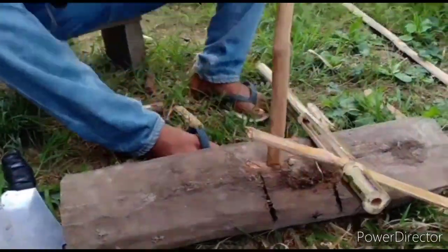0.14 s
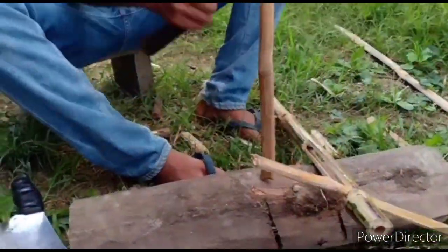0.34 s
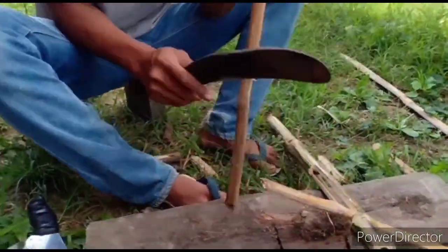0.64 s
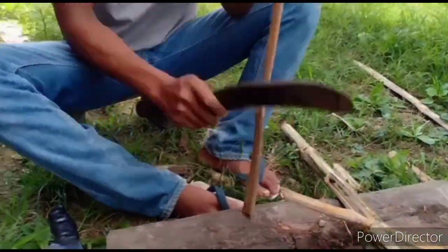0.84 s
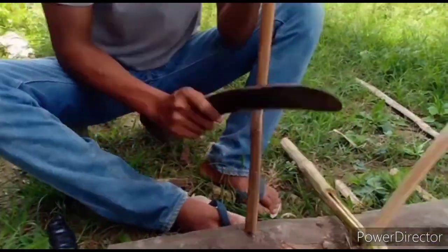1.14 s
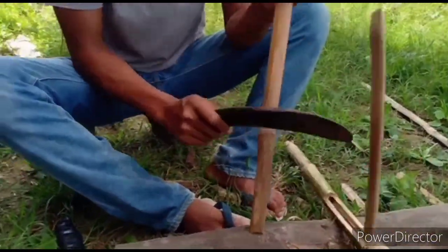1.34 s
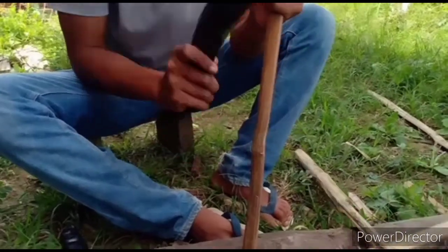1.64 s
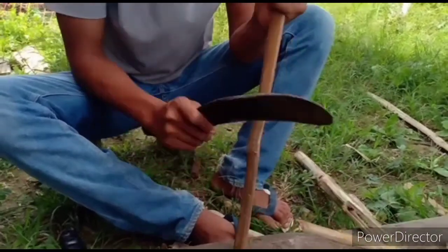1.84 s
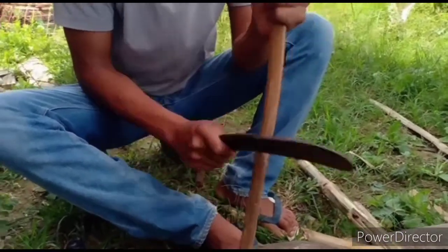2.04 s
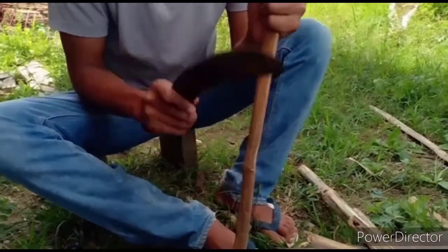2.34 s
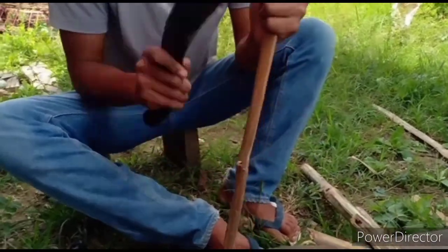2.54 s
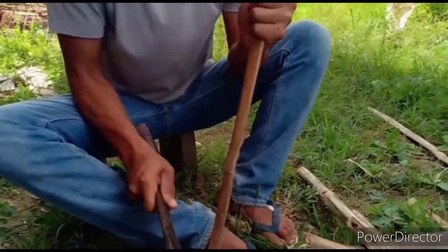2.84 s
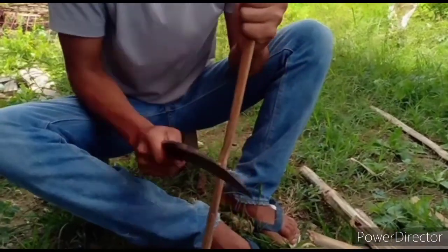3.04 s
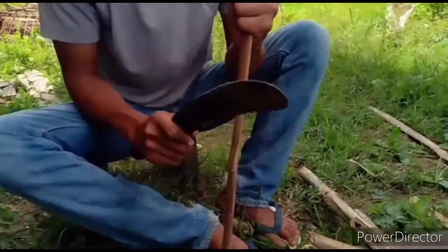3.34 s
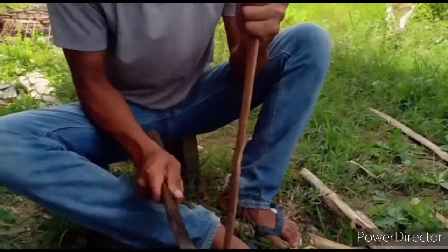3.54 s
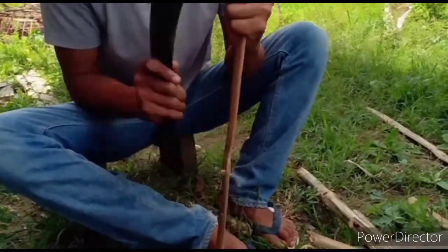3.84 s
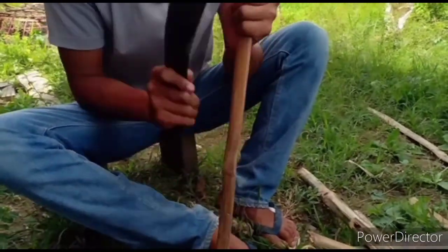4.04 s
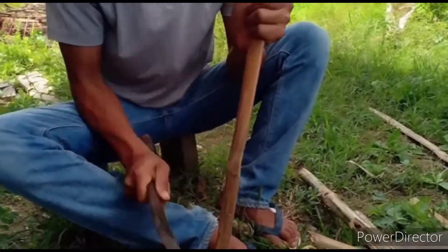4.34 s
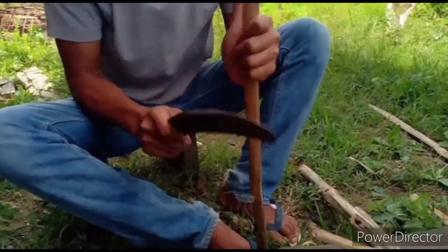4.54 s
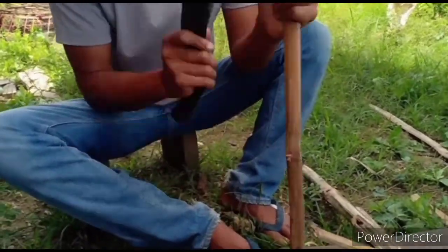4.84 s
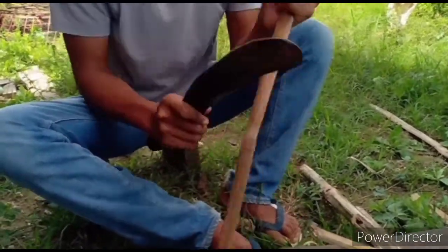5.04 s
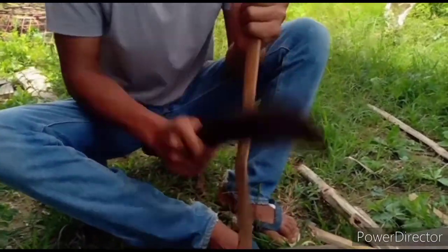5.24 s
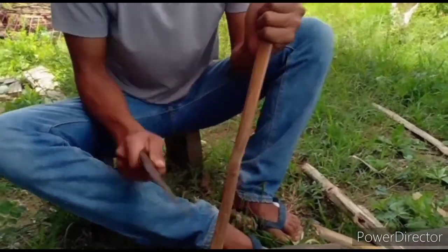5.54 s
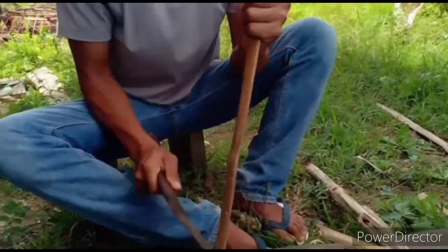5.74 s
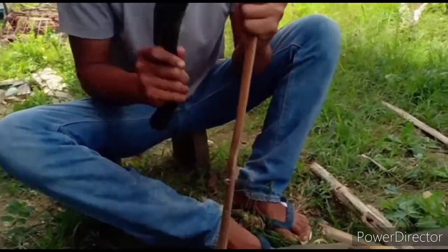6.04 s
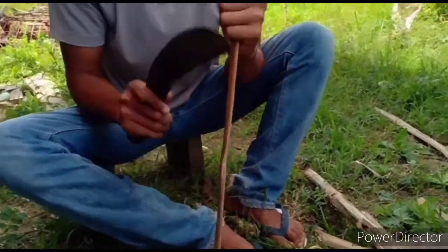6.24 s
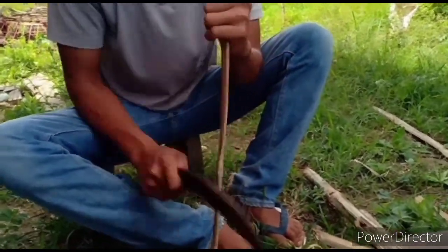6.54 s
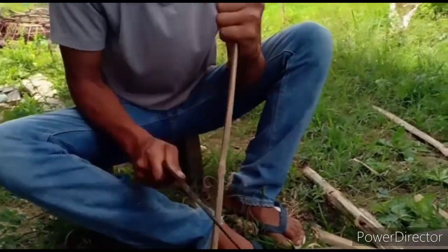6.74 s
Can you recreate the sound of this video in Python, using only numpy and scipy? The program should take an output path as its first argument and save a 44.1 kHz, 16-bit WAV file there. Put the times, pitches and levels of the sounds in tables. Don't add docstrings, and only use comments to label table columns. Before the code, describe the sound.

Close up outdoors, a steel blade gives a faint short ring, then chops a standing bamboo stick about five times a second. Each stroke is a sharp woody crack with a brief fibrous rip, while splinters and hollow offcuts tick and ring. Low wind gusts thump the small, thin-sounding microphone over faint hiss; a distant dove is barely audible. The last strokes grow lighter.

```python
import sys
import numpy as np
from scipy import signal
from scipy.io import wavfile
from scipy.ndimage import uniform_filter1d

SR = 44100
rng = np.random.default_rng(int(sys.argv[2]) if len(sys.argv) > 2 else 0)


def linear_from_db(decibels):
    return 10 ** (np.asarray(decibels, float) / 20)


def digitize_waveform(pressure):
    field = np.atleast_2d(pressure).T
    bounded = np.clip(field, -1, 1)
    quanta = np.round(bounded * 32767).astype(np.int16)
    wavfile.write(sys.argv[1], SR, quanta)


N = 303408

# pitch_hz, level_db
FIELD_COLOUR = [(18, -47), (30, -47), (48, -5), (196, -3.5), (732, -7), (1120, -11.5), (1840, -13),
                (2400, -15.5), (14800, -22.5), (16500, -26)]
# peak_s, level_db, swell_ms (to rise 20 dB), fade_ms (to fall 20 dB)
GUSTS = [(0.248, -34, 123, 74), (0.441, -37.5, 135, 187), (.69, -39.5, 39, 350), (.88, -36.5, 118, 323),
         (1.18, -37, 52, 45), (1.46, -40, 703, 111), (1.89, -34, 222, 76), (2.279, -36, 100, 30),
         (2.55, -39.5, 319, 175), (2.681, -35.5, 12, 98), (2.869, -35, 31, 66), (2.996, -32, 30, 44),
         (3.18, -52.5, 400, 400), (3.349, -41.5, 35, 206), (3.53, -45.5, 400, 300), (3.659, -32, 74, 140),
         (4.05, -41, 330, 57), (4.46, -31, 106, 37), (4.58, -44, 300, 502), (4.82, -47, 400, 105),
         (4.94, -42, 19, 289), (5.08, -41.5, 148, 64), (5.21, -43.5, 98, 1), (5.52, -35.5, 205, 218),
         (5.94, -43, 90, 247), (6.15, -41, 24, 795), (6.4, -46.5, 800, 100), (6.442, -27, 23, 81),
         (6.474, -27, 66, 13), (6.6, -50, 200, 342)]
# start_s, level_db, pitch_hz
SLAPS = [(0.241, -14.5, 188), (0.682, -33, 263), (0.737, -22, 232), (.764, -27, 260), (.781, -28, 280),
         (1.167, -14, 290), (1.187, -16, 265), (1.735, -38, 325), (1.867, -16.5, 184), (2.351, -21, 364),
         (2.376, -24.5, 310), (2.225, -26, 223), (2.453, -23, 408), (2.537, -16, 246), (2.608, -21.5, 155),
         (2.681, -13, 234), (2.876, -22, 219), (3.345, -29, 165), (3.654, -37, 210), (3.704, -18.5, 159),
         (4.126, -19, 478), (4.659, -21, 227), (4.808, -20.5, 260), (4.931, -22.5, 179), (5.063, -22, 160),
         (5.387, -24, 267), (5.46, -17, 205), (5.501, -14.5, 151), (6.047, -21, 191), (6.149, -21, 255),
         (6.253, -19, 178), (6.323, -18.5, 180), (6.265, -15, 310),
         (.178, -23, 251), (0.191, -21, 140), (.44, -26, 240), (0.861, -23, 280), (.925, -18, 229),
           (0.944, -32, 230), (1.153, -20, 300), (1.326, -27, 260), (1.452, -26, 129), (1.832, -23, 200),
           (1.849, -24, 200), (1.887, -16, 198), (2.534, -19, 105), (2.675, -21, 125), (2.978, -20, 148),
           (3.858, -19, 150), (3.958, -25, 170), (4.447, -13, 404), (4.463, -31, 130), (4.966, -20, 302),
           (5.197, -32, 240), (5.526, -24, 238), (6.164, -23, 258), (6.424, -17, 140), (6.449, -13, 251),
           (6.459, -15, 141), (6.469, -8, 237), (6.632, -25.5, 130)]
# start_s, level_db, pitch_hz
SPIKES = [(0.199, -31.5, 560), (0.238, -28.5, 560), (0.246, -20.5, 427), (0.29, -35, 344),
          (0.878, -23.5, 480), (0.915, -29.5, 393), (0.949, -30.5, 386), (0.968, -36, 404),
          (1.304, -30.5, 356), (1.451, -31, 361), (1.832, -34, 400), (1.874, -26, 474), (1.961, -31, 470),
          (2.4555, -32, 630), (2.531, -33, 401), (2.88, -32, 474), (3.0, -31, 410), (3.353, -31, 338),
          (3.657, -24.5, 364), (4.036, -32.5, 370), (4.433, -27.5, 500), (4.498, -38, 861),
          (5.457, -30, 520), (6.254, -30, 444), (6.414, -42, 390), (6.433, -26, 366), (6.449, -27.5, 425),
          (6.468, -27, 333), (6.475, -43, 396)]
# start_s, length_s, pitch_hz, level_db
COOS = [
    (0.084, 0.067, 554, -56),
    (1.556, 0.17, 655, -62.5),
    (3.07, 0.06, 664, -58),
]
# time_s, level_db
SCRAPE = [
    (0.648, -37),
    (0.682, -47.5),
    (0.72, -51),
    (0.84, -71),
]
# start_s, level_db, pitch_hz
THUDS = [
    (0.671, -25.5, 970),
    (3.944, -13, 970),
    (5.748, -17, 1030),
]
# start_s, pitch_hz, level_db,
# fade_s (to fall 60 dB)
PIECES = [(0.0328, 1780, -36, .04), (.427, 3900, -40, .02), (0.418, 1160, -52, 0.029),
          (0.455, 1920, -47, .06), (.6485, 2380, -28, .03), (.648, 1800, -35, 0.022),
          (.6715, 1880, -37, 0.07), (1.066, 1880, -45, 0.05), (1.092, 4350, -26, 0.03),
          (1.095, 2900, -41, .1), (1.093, 6000, -24, 0.02), (1.218, 4900, -38, 0.013),
          (1.218, 5930, -45, .025), (1.729, 5250, -43, 0.08), (1.733, 3000, -40, .07),
          (1.729, 1120, -38, .12), (1.728, 2180, -44, .1), (1.81, 1836, -52, 0.13),
          (1.927, 1240, -41, 0.033), (1.93, 3530, -46, .06), (2.083, 2070, -37, .025),
          (2.087, 3160, -48, .07), (2.268, 1780, -51, .06), (2.268, 3700, -52, 0.055),
          (2.46, 1260, -32, 0.034), (2.463, 1696, -44, 0.079), (2.461, 4380, -34, 0.051),
          (2.646, 680, -36, 0.026), (2.65, 3210, -39, .07), (2.65, 1893, -32.5, 0.066),
          (2.846, 1238, -33, 0.029), (3.225, 2745, -23, .03), (3.225, 6000, -24.5, .02),
          (3.238, 1755, -39, 0.05), (3.229, 4080, -32, 0.055), (3.73, 877, -32.5, 0.039),
          (3.735, 1635, -29, 0.035), (3.742, 3250, -41, .07), (3.911, 5900, -26, .02),
          (3.914, 3682, -38, 0.04), (3.914, 860, -33, .025), (3.953, 4070, -34, 0.03),
          (3.951, 1395, -38, 0.03), (3.948, 1755, -47, .05), (4.52, 3920, -36, 0.051),
          (4.585, 1776, -39, 0.061), (4.585, 3330, -40, .035), (4.75, 3330, -40.5, 0.024),
          (4.749, 910, -36.5, 0.019), (4.983, 1880, -46, 0.12), (4.631, 1400, -57, 0.028),
          (5.302, 3740, -35, .06), (5.303, 890, -44.5, .06), (5.318, 1710, -39, 0.047),
               (5.49, 4059, -23, 0.041), (5.49, 2700, -30, .02), (5.716, 1740, -32, 0.047),
               (5.764, 4075, -46, 0.11), (5.752, 1400, -33, .03), (5.932, 1690, -25, 0.035),
               (5.941, 764, -32, 0.06), (6.138, 2800, -35, .025), (6.138, 1410, -38, 0.031),
               (6.141, 4030, -38, 0.084), (6.365, 11940, -33, 0.032), (6.365, 2170, -41, 0.047),
               (6.565, 8021, -38, .025), (6.565, 2190, -42, .03), (6.568, 1400, -47, .05),
               (6.76, 1860, -42.5, 0.072), (6.76, 1520, -42, .05), (6.76, 855, -38, .05),
          (.033, 2100, -33, .015), (.061, 1880, -46, .16), (.648, 4130, -39, .04),
                 (1.094, 703, -39, 0.18), (1.7045, 4500, -24, 0.018), (1.741, 840, -41.5, 0.14),
                 (1.742, 2020, -45, .12), (2.46, 2000, -24, 0.018), (3.9455, 3250, -22, 0.022),
                 (4.1275, 1550, -27, 0.02), (5.298, 4950, -24, .015),
          (.0328, 4900, -48, .02), (.678, 1950, -38, .025), (.687, 2350, -41, .06),
             (.654, 2400, -36, .03), (1.069, 1880, -31, .05), (1.1, 4200, -36, .06), (2.268, 850, -26, .05),
             (3.043, 3500, -27, .03), (3.058, 1780, -42, .07), (4.1315, 640, -25, .03),
             (4.142, 3350, -39, .05), (4.318, 3650, -29, .04), (5.95, 3400, -36, .03),
             (5.941, 1550, -21, .02)]
# pitch_hz, level_db, fade_s
SHAVING = [(3640, 0, 0.085), (3200, -24, 0.066), (1750, -23, 0.28)]
# pitch_hz, level_db, fade_s
CHIP = [(1395, -6, 0.13), (1610, -17, 0.025), (3200, -13, 0.011), (4134, -24, 0.06), (4060, -20, 0.07),
        (7800, -40, 0.046)]
# pitch_hz, level_db, fade_s
HOLLOW = [(720, 8.5, 0.088), (847, -10.5, 0.26), (1260, -3.5, 0.22), (1734, -1.5, 0.14), (2240, -22, 0.07),
          (1836, -3, 0.14), (4050, -18, 0.052), (5300, -16, 0.054)]
# pitch_hz, level_db, fade_s
BLADE = [(1885, 4.5, 0.046), (1780, -35, 0.31), (3620, -39, 0.018), (860, -5, 0.011), (1300, -2, 0.014)]
# start_s, level_db
SHAVING_RINGS = [(2.652, -38), (3.042, -34), (3.228, -45), (4.132, -39), (4.316, -38)]
# start_s, level_db
CHIP_RINGS = [
    (3.944, -28),
    (5.7518, -32),
    (6.762, -41.5),
]
# start_s, level_db
HOLLOW_RINGS = [(0.42, -41.5), (1.092, -35.5), (1.255, -57), (1.727, -35), (1.741, -41.5), (2.265, -51)]
# start_s, level_db
BLADE_RINGS = [(0.0321, -20.5), (0.0411, -37), (0.4195, -30), (0.673, -39), (1.065, -54), (1.1284, -44),
               (1.489, -41), (4.128, -35), (4.584, -34), (4.7489, -38.5), (4.9469, -29), (4.9566, -21),
               (5.4903, -32), (5.942, -36)]
# start_s, change_db
GRIPS = [
    (0.0475, -18),
    (4.9645, -8),
]
# start_s, level_db
KNOCKS = [(0.0322, -27), (1.7040, -24.5), (2.081, -17), (2.4597, -17), (2.6447, -23), (2.846, -18.5),
          (4.1279, -23), (4.3119, -24.5), (4.5154, -15), (4.9473, -21), (5.2975, -11), (5.4894, -25.5),
          (5.7119, -24)]
# pitch_hz, level_db
FIBRES = [(180, -12), (300, -14), (820, -3.5), (1900, -7.5), (2520, -12.5), (3650, -8), (5190, -7.5),
          (8730, -8), (12600, -6), (15200, -21), (16500, -4)]
# pitch_hz, fade_s
TEAR_FADE = [(500, 0.068), (3500, 0.09), (5500, 0.062), (9000, 0.052), (15000, 0.08)]
# start_s, blow_db, stick_hz, tear_db, treble_db
CHOPS = [(0.3855, -13, 2660, -12.5, -3.5), (1.0645, -12, 2090, -13, -11.5), (1.0923, -13, 1830, -11, -12.5),
         (1.7041, -13.5, 1190, -15, -9.5), (2.0817, -10, 814, -16, -9.5), (2.2639, -11, 830, -9.5, -12.5),
         (2.4596, -8, 1920, -15, -13), (2.6449, -9, 1260, -8.5, -4.5), (2.845, -9.5, 1850, -9.5, -2),
         (3.0397, -16, 1630, -9, -6), (3.2238, -15, 1680, -8, 0), (3.5368, -14, 870, -10.5, -3),
         (3.7296, -13.5, 1550, -14.5, -13), (3.9094, -12, 1850, -13, -1), (4.1269, -13, 610, -13.5, -8.5),
         (4.3119, -10.5, 1660, -7.5, -1), (4.5155, -8.5, 1400, -13.5, -11), (4.9472, -6.5, 1450, -10, -9),
         (5.2978, -6, 1580, -13, -11), (5.4893, -8, 1380, -7.5, -5), (5.7117, -11, 1270, -9.5, -9),
         (5.9318, -15.5, 1590, -12, -5), (6.1371, -22, 1640, -12.5, -3), (6.364, -27, 2240, -17, 0)]
# start_s, blow_db, stick_hz, tear_db, treble_db
TOUCHES = [(0.0326, -36, 1880, -42, -33), (0.4182, -25, 1900, -24, -6), (0.6715, -46, 2000, -22, -55),
           (0.8939, -28, 870, -24, -14), (1.128, -42, 1900, -35, -26), (1.218, -28.5, 1300, -34, -22),
           (1.254, -42, 1300, -42, -30), (1.488, -26.5, 1730, -37.5, -48), (1.727, -22, 1080, -25, -18),
           (1.926, -24, 870, -24.5, -34), (3.152, -50, 1710, -39.5, -26), (3.3495, -31.5, 904, -37, -55),
           (3.9455, -30, 1270, -35, -13), (4.585, -28, 1800, -38, -28), (4.7482, -31.5, 1820, -42, -17),
           (4.9544, -20, 1820, -23, -33), (5.1239, -34, 865, -45, -49), (5.749, -28, 1310, -36, -11),
           (5.9415, -16, 1590, -24, -20), (6.564, -24, 1980, -19.5, -1), (6.7564, -26, 1390, -20, -6)]
# start_s, splinter_hz, level_db (against the blow)
SPLINTERS = [(0.386, 5070, 6), (0.894, 3200, -11), (1.064, 5950, -9), (1.092, 8040, 2.5), (1.218, 7600, -5),
             (1.254, 1580, 1), (1.704, 4530, -5), (1.727, 2940, -11), (1.925, 4460, -.5),
             (0.671, 2020, -11), (2.46, 2280, -32), (5.941, 3080, -16), (2.082, 4400, 1), (2.264, 4500, 1),
             (1.128, 2900, 0), (3.04, 3480, -0.5), (3.224, 4300, 2), (3.73, 4400, -3), (3.909, 4290, -2.5),
             (3.945, 3250, 9), (4.127, 3430, -1), (4.312, 3600, -15), (4.585, 3200, -3), (4.749, 3100, -8),
             (4.947, 5200, -11), (5.712, 4070, -6), (5.932, 4500, 3), (6.137, 4420, 8.5),
             (6.364, 4800, 8.5)]


def evened(x):
    return x / np.sqrt(np.mean(x ** 2) + 1e-20)


def peaked(x):
    return x / abs(x).max()


def read(points, hz):
    f, value = np.transpose(points)
    return np.interp(np.log(hz + 1), np.log(f + 1), value)


def add(mix, s, sound):
    part = mix[max(round(s * SR), 0):][:len(sound)]
    part += sound[:len(part)]


def resonate(x, hz, width):
    turn = np.exp(2j * np.pi * np.cumsum(hz * np.ones(len(x))) / SR)
    r = np.exp(-np.pi * width / SR)
    smooth = signal.lfilter([1 - r], [1, -r], x / turn + 1e-18)
    return 2 * (turn * smooth).real


def push(hz, tail, cusp):
    turn = np.arange(-1, 3, hz / SR)
    return np.cos(2 * np.pi * turn) * np.exp(-abs(turn / np.where(turn < 0, .4, tail)) ** cusp)


def breaker(hz, front):
    t = np.arange(-1, 3, hz / SR) / hz
    return -np.tanh(t / front) * np.exp(-abs(t * hz / np.where(t < 0, .25, .5)) ** 1.88)


def field():
    frames, hz = N // 256 + 5, np.fft.rfftfreq(1024, 1 / SR)
    a, b, patches = rng.standard_normal((frames, 513, 3)).T
    patches = uniform_filter1d(patches, size=12, axis=0)
    patches = evened(uniform_filter1d(patches, size=14, axis=1))
    z = (a + 1j * b) * linear_from_db(read(FIELD_COLOUR, hz)[:, None] + .6 * patches)
    hiss = signal.istft(z, nperseg=1024, noverlap=768)[1][:N]
    return linear_from_db(-60) * evened(hiss)


def gustiness(t):
    calm_db = -69
    s, peak_db, swell_ms, fade_ms = np.transpose(GUSTS)[:, :, None]
    below_db = 20 * abs(t - s) / (np.where(t < s, swell_ms, fade_ms) / 1000)
    return 10 * np.log10(linear_from_db(calm_db) ** 2 + (linear_from_db(peak_db - below_db) ** 2).sum(axis=0))


def turbulence():
    frames, hz = N // 128 + 5, np.fft.rfftfreq(512, 1 / SR)[:, None]
    t = np.arange(frames) * 128 / SR
    level_db = gustiness(t)
    eddies = rng.standard_normal(frames)
    lumps = np.tanh(0.76 * evened(uniform_filter1d(eddies, size=3)))
    clumps = evened(uniform_filter1d(uniform_filter1d(eddies, size=8), size=8))
    edge_hz = 300 * linear_from_db(0.1 * level_db + 4.5 + 7.4 * lumps)
    dark = (1 + (hz / edge_hz) ** 2) ** -1.8 / np.sqrt(edge_hz)
    shape = linear_from_db(2.3 * lumps + 1.4 * clumps) * dark
    z = rng.standard_normal((frames, 257, 2)).T
    rumble = signal.istft((z[0] + 1j * z[1]) * shape, nperseg=512, noverlap=384)[1][:N]
    return evened(rumble) * linear_from_db(np.interp(np.arange(N) / SR, t, level_db))


def wind():
    out = turbulence()
    for s, slap_db, hz in SLAPS:
        add(out, s, -linear_from_db(slap_db - 9.0) * push(hz, 0.54, 1.05))
    for s, spike_db, hz in SPIKES:
        front_s = 0.00033 * linear_from_db(-.3 * (spike_db + 26))
        add(out, s - .6 / hz, -linear_from_db(spike_db + 3.5) * breaker(hz, front_s))
    add(out, 6.4425, -linear_from_db(-13.5) * breaker(301, 0.00018))
    return out


def coo(s, length, hz, db):
    t = np.arange(0, length, 1 / SR)
    breath = evened(resonate(rng.standard_normal(SR)[:len(t)], hz, 40))
    hoot = np.sin(2 * np.pi * hz * t) + 0.53 * breath
    return s, linear_from_db(db + 1.0) * hoot * signal.windows.tukey(len(t), .4)


def ground(x):
    t = np.arange(5000) / SR
    scattered = rng.choice([-1., 1.], len(t)) * (rng.random(len(t)) < .05)
    taps = scattered * linear_from_db(-60 * t / 0.12) * (t > .003)
    taps = signal.lfilter([.5], [1, -.5], taps)
    return signal.oaconvolve(x, taps / np.linalg.norm(taps))[:N]


def with_echoes(x):
    return x + linear_from_db(-20) * ground(x)


def scrape():
    s, level_db = np.transpose(SCRAPE)
    t = np.arange(s[0], s[-1], 1 / SR)
    since = t - s[0]
    grit, hold = rng.standard_normal(size=(2, SR))[:, :len(t)]
    slips = grit * linear_from_db(2.8 * evened(uniform_filter1d(hold, size=30)))
    dull = signal.sosfilt(signal.butter(N=7, Wn=5200, fs=SR, output="sos"), slips)
    body = resonate(dull, 2350 - 2600 * since, 500)
    body += linear_from_db(1) * resonate(dull, 1700, 700)
    body += linear_from_db(-3 - 130 * since) * resonate(dull, 4000, 700)
    return s[0], linear_from_db(np.interp(t, s, level_db)) * evened(body) * signal.windows.tukey(len(t), .02)


def pieces():
    t, out = np.arange(6000) / SR, np.zeros(N)
    rise = 1 - np.exp(-t / .0004)
    for s, hz, db, t60 in PIECES:
        pair = np.sin(2 * np.pi * hz * t)
        pair += linear_from_db(-8) * np.sin(2 * np.pi * hz * 1.035 * t)
        pair *= 1 + .22 * evened(uniform_filter1d(rng.standard_normal(len(t)), size=110))
        add(out, s, linear_from_db(db - 60 * t / t60) * rise * pair)
    return with_echoes(out)


def ringing(modes, blows, rise, rattle):
    t, out = np.arange(8000) / SR, np.zeros(N)
    for s, blow_db in blows:
        for (hz, db, t60), luck in zip(modes, rng.standard_normal((len(modes), len(t)))):
            swing = linear_from_db(blow_db + db + luck[0] - 60 * t / t60) * (1 - np.exp(-t / rise))
            swing *= 1 + rattle * evened(uniform_filter1d(luck, size=130))
            add(out, s, swing * np.sin(2 * np.pi * hz * (1 + luck[1] / 500) * t))
    return out


def grip():
    closing_s, held_s = .003, .2
    t = np.arange(N) / SR
    return linear_from_db(sum(db * np.clip((t - s) / closing_s, 0, 1) * (t < s + held_s) for s, db in GRIPS))


def causal(gain_db):
    circle_db = np.r_[gain_db, gain_db[-2:0:-1]]
    log_gain = np.log(linear_from_db(np.maximum(circle_db, -100)))
    return np.fft.ifft(np.exp(np.conj(signal.hilbert(log_gain)))).real[:len(gain_db) // 2]


def coloured(x, treble_db):
    hz = np.fft.rfftfreq(1024, 1 / SR)
    tilt_db = treble_db / (1 + (6500 / (hz + 1)) ** 4)
    return signal.oaconvolve(x, causal(read(FIBRES, hz) + tilt_db))[:len(x)]


def chop(blow_db, stick_hz, splinter_hz, splinter_db, treble_db):
    luck = rng.standard_normal((2, 1024))
    t = np.arange(1024) / SR
    snaps = luck[0] * linear_from_db(3 * luck[1]) * (1 - np.exp(-t / .0002)) * np.exp(-(t / .0015) ** 1.3)
    sound = 1.13 * peaked(coloured(snaps, treble_db))
    sound += 0.46 * peaked(resonate(snaps, stick_hz, 200))
    splinter = resonate(resonate(snaps, splinter_hz, 800), splinter_hz, 1100)
    sound += linear_from_db(splinter_db) * peaked(splinter)
    add(sound, 0, 1.1 * push(1667, 0.68, 0.73))
    return linear_from_db(blow_db - 7.5) * sound


def tear(tear_db, treble_db):
    luck = rng.standard_normal((2, 6144))
    t = np.arange(6144) / SR
    clumps = linear_from_db(2.3 * evened(uniform_filter1d(luck[0], size=90)))
    hz, frames, z = signal.stft(luck[1] * clumps, SR, nperseg=64)
    t60 = 0.82 * read(TEAR_FADE, hz)[:, None]
    rip = signal.istft(z * linear_from_db(-60 * frames / t60), SR, nperseg=64)[1][:len(t)]
    rip = coloured(rip * (1 - np.exp(-t / 0.00017)), treble_db)
    rip += 0.4 * resonate(rip, 1970, 410) + 1.01 * resonate(rip, 2910, 800)
    return linear_from_db(tear_db - 17.5) * rip / np.std(rip[:400])


def splinter_of(s):
    for start, hz, db in SPLINTERS:
        if abs(start - s) < .004:
            return hz, db
    return 4260, -10.5


def blade_work():
    out = np.zeros(N)
    for s, blow_db, stick_hz, tear_db, treble_db in sorted(CHOPS + TOUCHES):
        splinter_hz, splinter_db = splinter_of(s)
        add(out, s, chop(blow_db, stick_hz, splinter_hz, splinter_db, treble_db + 6.5))
        rip = tear(tear_db, treble_db)
        rip = rip + resonate(rip, stick_hz, 77) + 0.65 * resonate(rip, splinter_hz, 180)
        add(out, s + .0004, rip)
    return out


def scene():
    near = blade_work() + grip() * ringing(BLADE, BLADE_RINGS, rise=0.0012, rattle=0.2)
    near += ringing(HOLLOW, HOLLOW_RINGS, rise=0.0012, rattle=0.45)
    near += ringing(CHIP, CHIP_RINGS, rise=.0004, rattle=.15)
    near += ringing(SHAVING, SHAVING_RINGS, rise=0.015, rattle=0.98)
    for s, thud_db, hz in THUDS:
        add(near, s, linear_from_db(thud_db - 1.0) * push(hz, 0.83, 4.6))
    for s, knock_db in KNOCKS:
        add(near, s, linear_from_db(knock_db) * push(1700, .8, 2))
    add(near, *scrape())
    for row in COOS:
        add(near, *coo(*row))
    return (with_echoes(near) + wind() + pieces())[None]


def band_limit(x):
    return signal.sosfilt(signal.butter(12, 16600, fs=SR, output="sos"), x)


def record(dry):
    bass_cut = signal.butter(N=4, Wn=142, btype="highpass", fs=SR, output="sos")
    thin = signal.sosfilt(bass_cut, dry)
    treble_limit = signal.firwin(255, 15600, window=("kaiser", 4), fs=SR)
    limited = signal.oaconvolve(thin + field(), treble_limit[None], "same")
    return band_limit(limited)


dry = scene()
out = record(dry)
digitize_waveform(out)
```